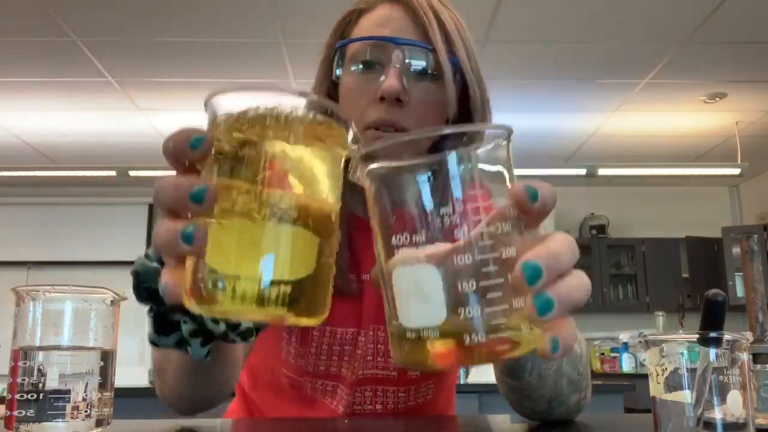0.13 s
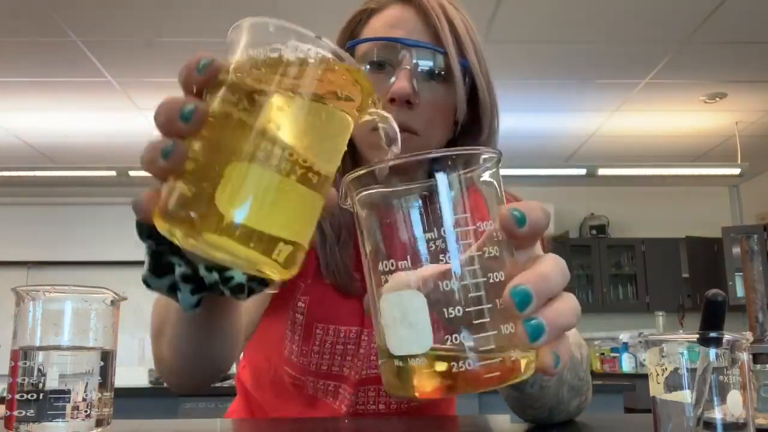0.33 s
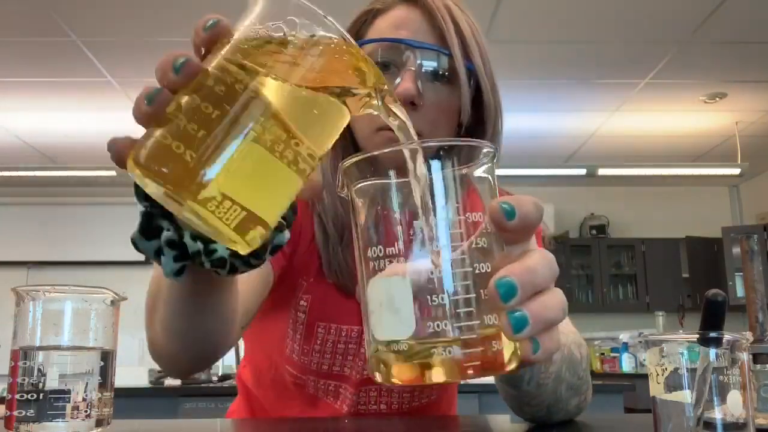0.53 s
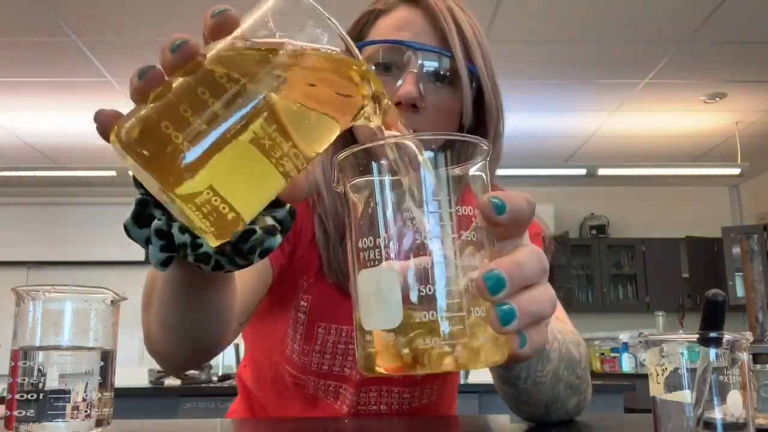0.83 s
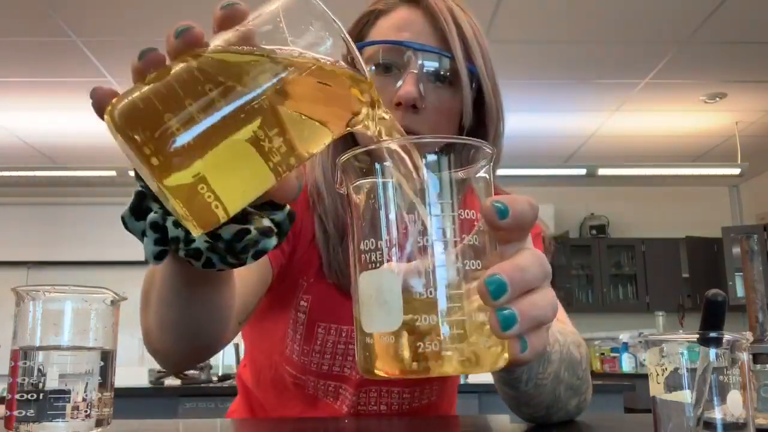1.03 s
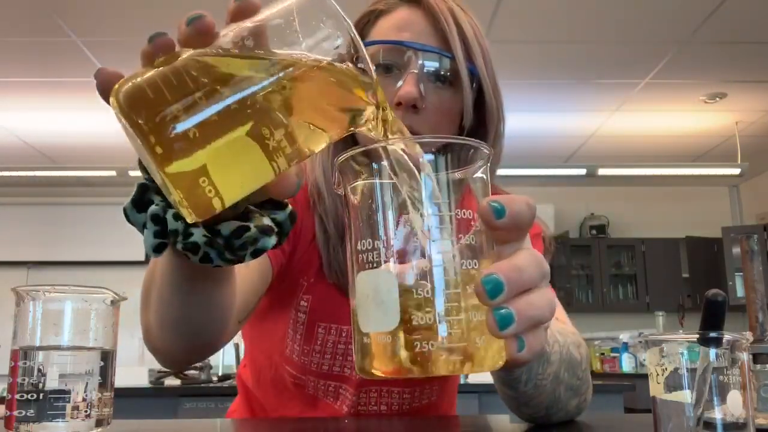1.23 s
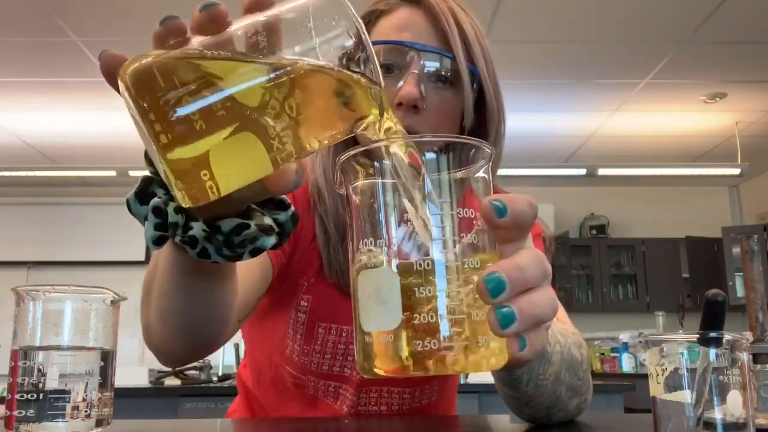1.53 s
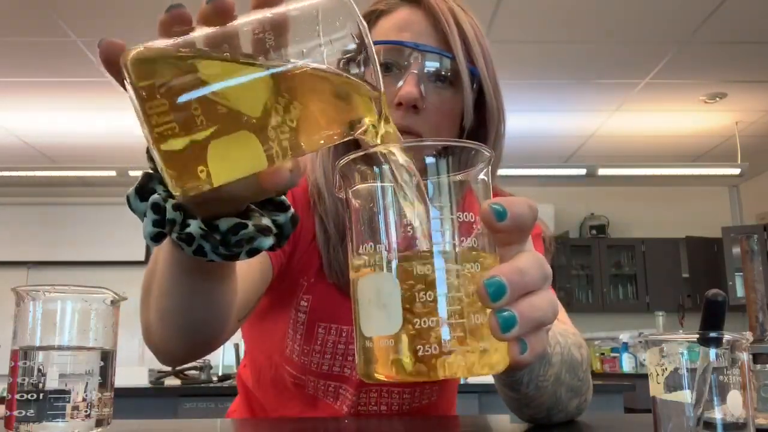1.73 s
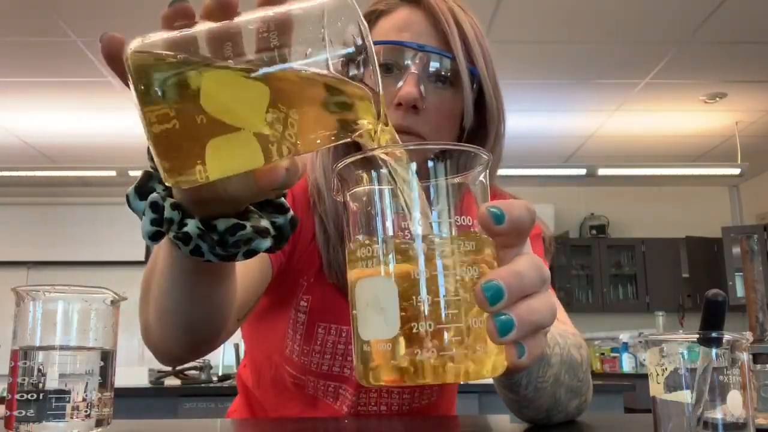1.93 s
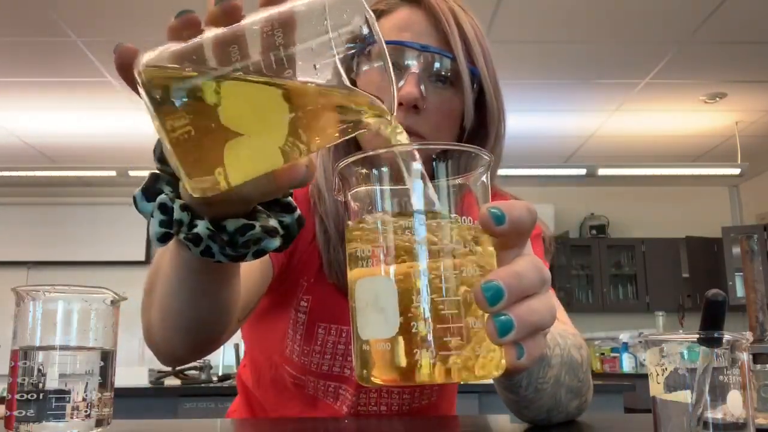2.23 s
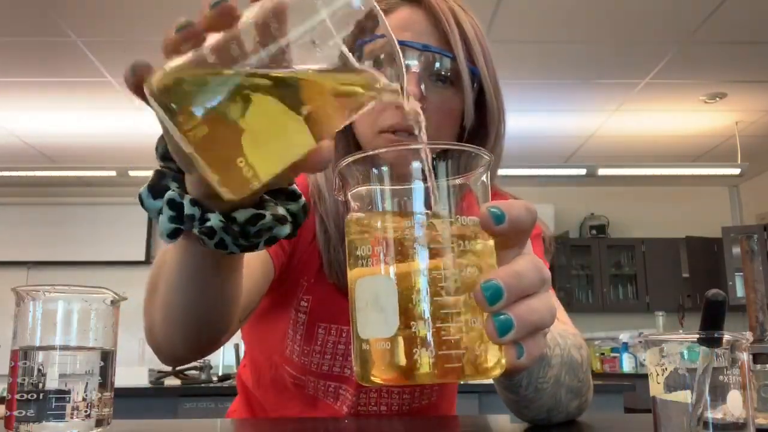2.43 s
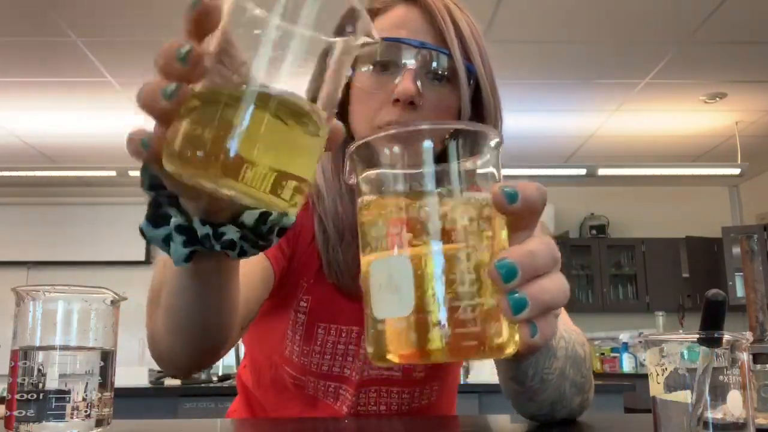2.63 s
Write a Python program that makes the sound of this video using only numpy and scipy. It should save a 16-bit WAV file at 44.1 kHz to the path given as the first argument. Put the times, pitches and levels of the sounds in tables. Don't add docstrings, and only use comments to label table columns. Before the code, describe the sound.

Liquid pours between glass beakers close to stereo microphones in a classroom. A hard clack rings out first over low ventilation hum, then bright splashes, fizzing droplets and hollow gurgles calm to a soft trickle.

```python
import sys
import numpy as np
from scipy import signal
from scipy.fft import rfft, irfft, next_fast_len
from scipy.io import wavfile

SR = 44100
rng = np.random.default_rng(int(sys.argv[2]) if len(sys.argv) > 2 else 0)


def wrap_up_sound(samples):
    columns = np.atleast_2d(samples).T
    tamed = np.clip(columns, -1, 1)
    steps = np.round(tamed * 32767).astype(np.int16)
    wavfile.write(sys.argv[1], SR, steps)


def to_linear_factor(level_db):
    exponent = np.asarray(level_db, float) / 20
    return 10 ** exponent


N = 123479

# [t/s, level/dB, fine spray level/dB]
STREAM = [(0.469, -76, 12), (.53, -65, 3), (.57, -65.5, 13), (.63, -69, 9), (.68, -59, 10), (.86, -58, 9.5),
          (.97, -63, 9.5), (1.05, -59, 4.5), (1.15, -63.5, 5), (1.2, -68, -6), (1.36, -58.5, 3),
          (1.47, -65, -11), (1.9, -66.5, -7), (2.2, -69, -7), (2.32, -69, 6.5), (2.66, -71.5, -3),
          (2.8, -80, -10)]
# [t/s, peak level/dB, f/Hz]
GULPS = [(0.668, -39.5, 1190), (0.722, -42, 1290), (0.786, -31.5, 849), (0.824, -35, 870),
         (0.834, -40, 813), (0.847, -39, 817), (0.891, -39.5, 818), (0.991, -39.5, 893),
         (1.015, -35.5, 1043), (1.03, -33.5, 816), (1.049, -26, 850), (1.099, -40, 830),
         (1.172, -38.5, 860), (1.203, -40, 867), (1.248, -38, 724), (1.269, -32.5, 739), (1.311, -38, 1380),
         (1.322, -38, 890), (1.344, -36, 877), (1.372, -37.5, 840), (1.412, -38, 1180), (1.451, -41, 970),
         (1.36, -39, 1380), (1.428, -43, 850), (1.463, -41.5, 810), (1.505, -45, 1240), (1.575, -48, 1090),
         (1.615, -51, 1110), (1.662, -45.5, 1093), (1.68, -44, 1100), (1.961, -45, 1310),
         (2.228, -47, 1480), (1.222, -46.5, 580), (1.647, -46, 1044), (1.801, -44, 1210),
         (1.819, -42.5, 1330), (2.345, -38.5, 1166), (2.581, -36.5, 1363)]
# [t/s, peak level/dB, f/Hz]
CHIRPS = [(0.4953, -43, 2550), (0.5355, -31, 2125), (0.5395, -30, 3260), (0.6519, -43, 2230),
          (0.6704, -37.5, 1970), (0.6863, -35.5, 2550), (0.7344, -38.5, 4240), (0.7397, -37.5, 2086),
          (0.7754, -36.5, 2000), (0.8051, -34.5, 1990), (1.0355, -45, 2100), (1.053, -39.5, 1970),
          (1.2965, -42, 2470), (1.3269, -47, 2650), (1.3713, -39.5, 1976), (2.452, -53, 2800),
          (2.392, -47.5, 3200), (2.4748, -46, 2480), (2.5805, -39.5, 2015), (2.6364, -49.5, 3350)]
FIZZ_PITCHES = [1164.5, 1411, 1950, 2327, 2650, 3000, 3350]
# [t/s, peak level/dB, lowest f/Hz, t60/s]
SPLASHES = [(0.5364, -28, 5950, 0.039), (0.5544, -31, 5070, 0.026), (0.577, -34.5, 8900, 0.026),
            (0.6526, -35, 5000, 0.01), (0.6803, -33.5, 7550, 0.037), (0.882, -28, 1160, 0.03),
            (0.933, -34.5, 6100, 0.045), (1.0461, -40.5, 9450, 0.039), (1.1046, -28, 5160, 0.0087),
            (1.2093, -45, 5000, 0.062), (1.2706, -54, 5000, 0.02), (1.3255, -50, 10000, 0.027),
            (1.3717, -45, 1500, 0.013), (1.412, -46, 3000, 0.03), (1.649, -45.5, 7400, 0.024),
            (1.8186, -51.5, 1510, 0.02), (2.017, -43, 6130, 0.018), (2.0502, -38, 4280, 0.025),
            (2.544, -46, 5000, 0.012), (2.579, -46.5, 1530, 0.013)]
# [t/s, peak level/dB, centre f/Hz]
TICKS = [(0.4648, -52, 15400), (0.4878, -50, 14500), (0.528, -34, 12700), (0.62, -38.5, 10200),
         (0.6625, -38, 10900), (0.691, -39, 10200), (0.7314, -39, 13600), (0.7422, -40, 13900),
         (0.7675, -40, 11200), (0.7824, -46, 10500), (0.812, -49, 10800), (1.0006, -40, 9800),
         (1.057, -41, 15500), (1.077, -42, 9700), (1.0894, -50, 15100), (1.1114, -47, 10500),
         (1.1204, -45, 13600), (1.152, -45, 9550), (1.226, -45, 14600), (1.3394, -53, 14800),
         (1.3997, -50, 14100), (1.4486, -55, 14000), (1.5968, -56.5, 14500), (1.699, -53, 9980),
         (1.9425, -51, 15300), (2.141, -57, 14300), (2.4867, -61, 13400), (2.6698, -62, 13300)]
# [t/s, peak level/dB, centre f/Hz]
PLINKS = [(0.6344, -44, 6520), (0.6974, -41.5, 6160), (1.01, -44.5, 4980), (1.038, -46.5, 4940),
          (1.1163, -42, 6200), (1.1404, -55, 5840), (1.1672, -50.5, 6150), (1.27, -48, 6200),
          (1.373, -41, 7050), (1.402, -44.5, 6360), (1.5224, -50.5, 5900), (1.6253, -50, 6160),
          (1.7573, -52, 5770), (1.8606, -46.5, 5830), (1.9056, -52.5, 5930), (2.0941, -57, 4560),
          (2.3274, -57, 5900), (2.4862, -56, 6350), (2.634, -52, 5930), (2.6894, -61, 4640)]
# [t/s, peak level/dB]
CLACKS = [
    (-.03, -28),
    (0.071, -43),
    (0.1093, -25.5),
]
# [f/Hz, level/dB]
CLACK_COLOUR = [(300, -8.5), (1400, 2), (2500, 0.5), (5000, 2), (9500, -6), (16000, -15)]
# [f/Hz, level/dB, t60/s]
GLASS_MODES = [(2650, -5, .04), (3325, 3, .06), (5800, -5, .04), (6550, -9, .02)]
# [f/Hz, level/dB]
SPRAY_COLOUR = [(700, 26.5), (1500, -3.5), (3000, 2), (4300, 8), (6000, 8), (8600, 8), (10200, 4.5),
                (12000, -9), (16000, -2.5)]
# [f/Hz, level/dB]
SLOSH_COLOUR = [(600, -12), (850, 3), (1150, -1.5), (1500, -9), (1750, -11.5), (2100, -7), (3300, -2),
                (4000, -15.5)]
# [f/Hz, level per Hz/dB]
RUMBLE_COLOUR = [(30, -31), (114, -16.5), (270, -8), (400, -17.5), (640, -20), (850, -35.5), (1650, -35.5),
                 (1850, -56)]
# [f/Hz, width/Hz, level/dB]
DUCT_HUMS = [(123.84, 2.5, -63), (206.66, 8.5, -55), (280.3, 7.6, -56.5), (340.4, 19, -62.5),
             (473, 17.7, -60.5)]
# [f/Hz, level/dB]
AIR_HISS_COLOUR = [(1500, -2), (1900, -6), (4000, -7.5), (16000, -18)]
# [f/Hz, correlation]
LIKENESS = [(60, 0.86), (150, 0.88), (280, 0), (950, 0)]
# [f/Hz, phase/rad]
PORT_LEAD = [(500, 0), (950, -.8), (2410, -1.9), (7300, -2.0), (9000, -2.9), (10800, -1.9), (13000, -.5)]
# [f/Hz, level/dB]
PORT_LEAN = [(1000, -3), (4000, 1.5), (8000, 0)]
# [f/Hz, level/dB]
PORTS_APART = [(1000, -2), (5000, -1), (8200, -14), (12000, -22)]


def at_hz(points, hz):
    p = np.array(points, float)
    return np.interp(np.log(hz + 1), np.log(p[:, 0] + 1), p[:, 1])


def rms_one(x):
    return x / np.sqrt(np.mean(x ** 2) + 1e-20)


def shaped(x, points):
    gain = to_linear_factor(at_hz(points, np.fft.rfftfreq(x.shape[-1], 1 / SR)))
    return irfft(rfft(x) * gain, x.shape[-1])


def split_filter(x, hz, kind):
    return signal.sosfilt(signal.butter(2, hz, kind, fs=SR, output="sos"), x)


def drift(rate):
    steps = rng.standard_normal(400)
    return np.interp(np.arange(N) / SR * rate, np.arange(400), steps)


def fade(start, t60):
    t = np.arange(N) / SR - start
    return (t >= 0) * to_linear_factor(-60 * np.maximum(t, 0) / t60)


def chance_times(draws, per_s):
    return np.cumsum(-np.log(draws)) / per_s


def overlay(s, sounds):
    length = sounds.shape[1]
    out = np.zeros(N + 2048)
    np.add.at(out, (s * SR).astype(int)[:, None] + np.arange(length), sounds)
    return out[:N]


def ports(x):
    size = next_fast_len(N + 4096)
    hz = np.fft.rfftfreq(size, 1 / SR)
    half = to_linear_factor(at_hz(PORT_LEAN, hz) / 2) * np.exp(.5j * at_hz(PORT_LEAD, hz))
    return irfft(rfft(x, size) * np.array([half, 1 / half]), size)[:, :N]


def diffuse(pair):
    return ports(pair[0]) + shaped(pair[1], PORTS_APART) * [[1], [-1]]


def ventilation():
    rumble_db, hiss_db = -50.5, -79
    hz = np.fft.rfftfreq(N, 1 / SR)
    gain = to_linear_factor(at_hz(RUMBLE_COLOUR + [(3000, -90)], hz))
    power = gain ** 2 / np.sum(gain ** 2) * to_linear_factor(2 * rumble_db)
    for peak_hz, width, db in DUCT_HUMS:
        hump = 1 / (1 + (2 * (hz - peak_hz) / width) ** 4)
        power = power + hump / hump.sum() * to_linear_factor(2 * db)
    alike = np.clip(at_hz(LIKENESS, hz), -.95, .95)
    mid, side = rfft(rng.standard_normal((2, N))) * np.sqrt(power * N / 4)
    rumble = irfft(np.sqrt(1 + alike) * mid + np.sqrt(1 - alike) * side * [[1], [-1]], N)
    hiss = rms_one(shaped(rng.standard_normal((2, N)), [(1000, -42)] + AIR_HISS_COLOUR))
    return rumble + to_linear_factor(hiss_db) * diffuse(hiss)


def clacks():
    crack_s, tail_db, low_t60_s, high_t60_s = 0.025, -10.5, 0.3, 0.24
    low, high, hit = rms_one(shaped(rng.standard_normal((3, 2, N)), CLACK_COLOUR))
    low, high = split_filter(low, 6000, "low"), split_filter(high, 6000, "high")
    tail, crack = 0, 0
    for s, db in CLACKS:
        fall = low * fade(s, low_t60_s) + high * fade(s, high_t60_s)
        tail = tail + to_linear_factor(db - 4 + tail_db) * fall
        hump = np.exp(-((np.arange(N) / SR - s - .003) / crack_s * 2) ** 2)
        crack = crack + to_linear_factor(db - 10.5) * fade(s, 1e3) * hump
    return diffuse(tail) + ports(hit[0] * crack)


def flow_db(column=1):
    s, db = np.transpose(STREAM)[[0, column]]
    return np.interp(np.arange(N) / SR, np.r_[s[0] - .02, s], np.r_[-60 + db[0], db])


def patches(x):
    edges = 600 * 1.4 ** np.arange(11)
    out = 0
    for low, high in zip(edges, edges[1:]):
        fine = (low > 4800) * flow_db(column=2) * (.6 if low < 8000 else 1)
        level = 2.5 * drift(90) + fine
        out = out + to_linear_factor(level) * split_filter(x, [low, high], "band")
    return out


def spray():
    per_s, spread_db, hiss_db, spray_db = 3000, 6.5, -17, -5
    sizes = to_linear_factor(spread_db * np.minimum(rng.exponential(1, N), 3)) * rng.choice([-1, 1], N)
    born = rng.random(N) < per_s * to_linear_factor(6 * drift(40)) / SR
    hiss = to_linear_factor(hiss_db + 1.8 * drift(29)) * rng.standard_normal(N)
    return to_linear_factor(flow_db() + spray_db) * patches(rms_one(sizes * born) + hiss)


def slosh():
    churn = rng.standard_normal((2, N)) * to_linear_factor(4 * drift(70))
    colour = [(300, -34)] + SLOSH_COLOUR + [(6000, -49)]
    return to_linear_factor(flow_db() + 2.5) * diffuse(rms_one(shaped(churn, colour)))


def ring(clicks, hz, t60):
    r, w = to_linear_factor(-60 / (t60 * SR)), 2 * np.pi * hz / SR
    return signal.lfilter([0, np.sin(w)], [1, -2 * r * np.cos(w), r * r], clicks + 1e-18)


def glass(knocks):
    return sum(to_linear_factor(db - 26) * ring(knocks, hz, t60) for hz, db, t60 in GLASS_MODES)


def bubbles(s, db, hz, cycles):
    attack_cycles, rise_per_cycle, wobble = 2.4, .002, 0.16
    n = np.arange(1400) / SR * hz[:, None]
    shape = (1 - np.exp(-n / attack_cycles)) ** 2 * to_linear_factor(-60 * n / cycles[:, None])
    shape = shape / shape.max(axis=1, keepdims=True)
    wave = shape * np.sin(2 * np.pi * n * (1 + rise_per_cycle * np.minimum(n, 20)))
    beat = rng.random((len(s), 2))
    wave = wave * (1 + wobble * np.sin(n * (.5 + beat[:, :1]) + 2 * np.pi * beat[:, 1:]))
    return overlay(s, to_linear_factor(db)[:, None] * wave)


def fizz():
    per_s, fizz_db, spread, cycles = 550, 11.5, 0.089, 40
    u = rng.random((2400, 5))
    s = chance_times(u[:, 0], per_s)
    u, s = u[s < N / SR], s[s < N / SR]
    db = flow_db()[(s * SR).astype(int)] + fizz_db - 18 * u[:, 1]
    pick = (u[:, 2] ** 1.5 * len(FIZZ_PITCHES)).astype(int)
    hz = np.take(FIZZ_PITCHES, pick) * np.exp(spread * (2 * u[:, 4] - 1))
    return bubbles(s, db, hz, cycles * (0.66 + u[:, 3]))


def gurgles():
    per_s, gurgle_db, spread, cycles = 160, 7.5, 0.1366, 36
    u = rng.random((2400, 4))
    s = chance_times(u[:, 0], per_s)
    u, s = u[s < N / SR], s[s < N / SR]
    db = flow_db()[(s * SR).astype(int)] + gurgle_db - 14 * u[:, 1]
    column_hz = 759 + 348 * (s - .5)
    hz = column_hz * np.exp(spread * (4 * u[:, 2] - 1.5))
    return bubbles(s, db, hz, cycles * (0.39 + u[:, 3]))


def film():
    start_s, length_s, start_hz, rise_hz_per_s = .46, 0.2, 4900, 8800
    t = np.arange(N) / SR - start_s
    shape = np.sin(np.pi * np.clip(t / length_s, 0, 1)) * to_linear_factor(-61.5 + 5.2 * drift(139.6))
    cycles = start_hz * t + rise_hz_per_s * t ** 2 / 2
    return shape * np.sin(2 * np.pi * cycles + 1.8 * drift(300))


def bursts(s, db, hz, t60, octaves):
    t, bins = np.arange(2048) / SR, np.fft.rfftfreq(2048, 1 / SR)
    band = np.exp(-.5 * (np.log2((bins + 1) / hz[:, None]) / octaves) ** 2)
    noise = irfft(rfft(rng.standard_normal((len(s), 2048))) * band)
    noise = noise / noise.std(axis=1, keepdims=True)
    shape = to_linear_factor(db[:, None] - 8.5 - 60 * t / t60) * np.minimum(t / 0.00068, 1)
    return overlay(s, noise * shape)


def droplets():
    tick_t60_s = 0.021
    u = rng.random((900, 3))
    s = chance_times(u[:, 0], 140)
    u, s = u[s < N / SR], s[s < N / SR]
    level = (flow_db() + flow_db(column=2))[(s * SR).astype(int)]
    spatter = bursts(s, level + 10.5 - 14 * u[:, 1], 4400 * 2.35 ** u[:, 2], tick_t60_s, octaves=.25)
    s, db, hz = np.transpose(TICKS)
    ticks = bursts(s, db + 2, hz, tick_t60_s, octaves=.25)
    s, db, hz = np.transpose(PLINKS)
    plinks = bursts(s, db + 5, hz, t60=.03, octaves=.11)
    return spatter + ticks + plinks


def chirps():
    return bubbles(*np.transpose(CHIRPS), np.full(len(CHIRPS), 32))


def splashes():
    out, n = np.zeros(N + 4000), np.arange(4000)
    for s, db, low_hz, t60 in SPLASHES:
        shape = to_linear_factor(db + 3.5 - 60 * n / SR / t60) * np.minimum(n / 30, 1)
        burst = rng.standard_normal(4000) * shape
        out[int(s * SR):int(s * SR) + 4000] += split_filter(burst, low_hz, "high")
    return signal.lfilter(*signal.butter(1, 6000, fs=SR), out[:N])


def gulps():
    return bubbles(*np.transpose(GULPS), np.full(len(GULPS), 18.2))


def room(x):
    room_db, t60_s, wall_cut_hz = -7.5, 0.1, 7300
    n = np.arange(16000)
    tail = rng.standard_normal((2, 16000)) * to_linear_factor(-60 * n / SR / t60_s) * (n > 130)
    tail = tail / np.sqrt(np.sum(tail[0] ** 2))
    x = signal.lfilter(*signal.butter(1, wall_cut_hz, fs=SR), x)
    return to_linear_factor(room_db) * signal.fftconvolve(x[None], tail, axes=1)[:, :N]


def scene():
    drops, hits = spray(), splashes()
    water = fizz() + gurgles() + film() + droplets() + chirps() + hits + gulps()
    water = water + shaped(drops, SPRAY_COLOUR)
    water = water + glass(to_linear_factor(-0.5) * drops + to_linear_factor(-6) * hits)
    return ventilation() + clacks() + slosh() + ports(water) + diffuse(room(water))


def top_cut(x):
    return signal.sosfilt(signal.butter(12, 16820, fs=SR, output="sos"), x)


def record(dry):
    low_pass = signal.cheby2(12, 60, 16700, fs=SR, output="sos")
    mix = signal.sosfilt(low_pass, dry)
    return top_cut(mix)


dry = scene()
out = record(dry)
wrap_up_sound(out)
```